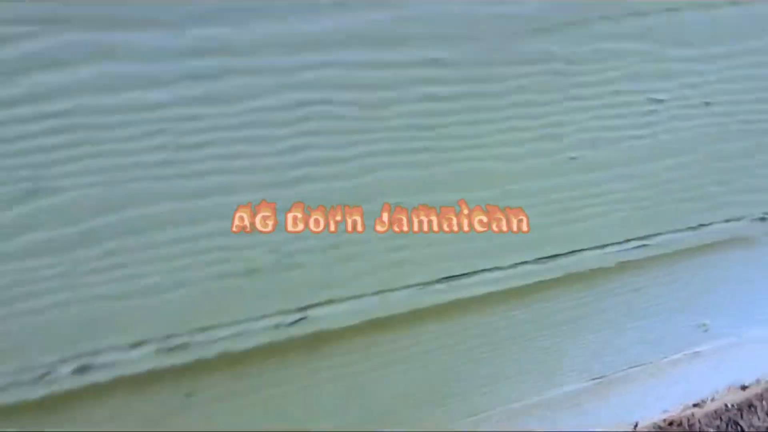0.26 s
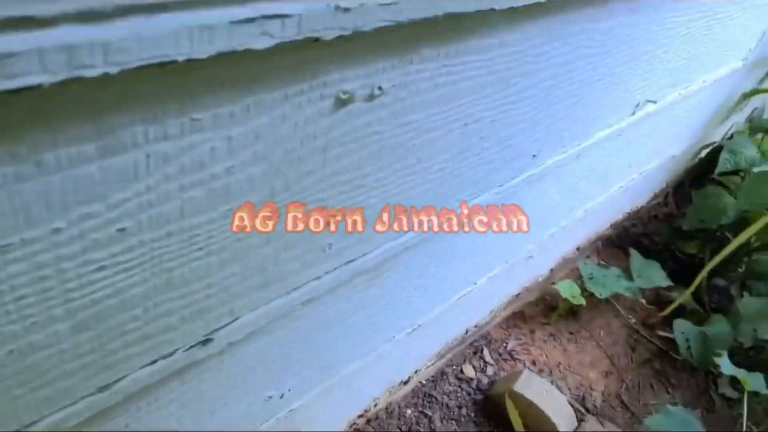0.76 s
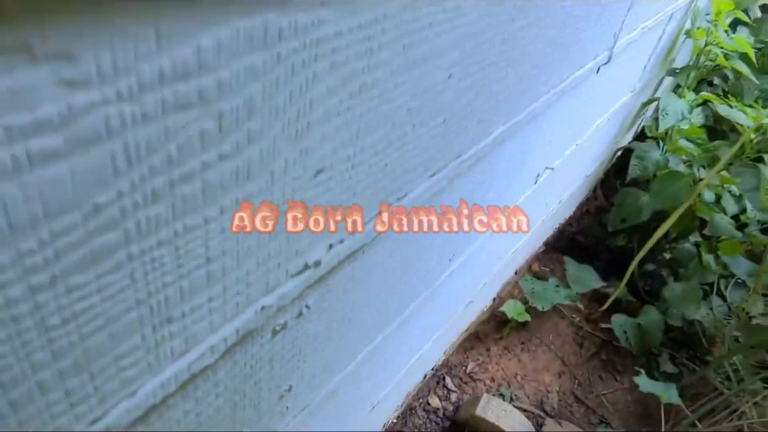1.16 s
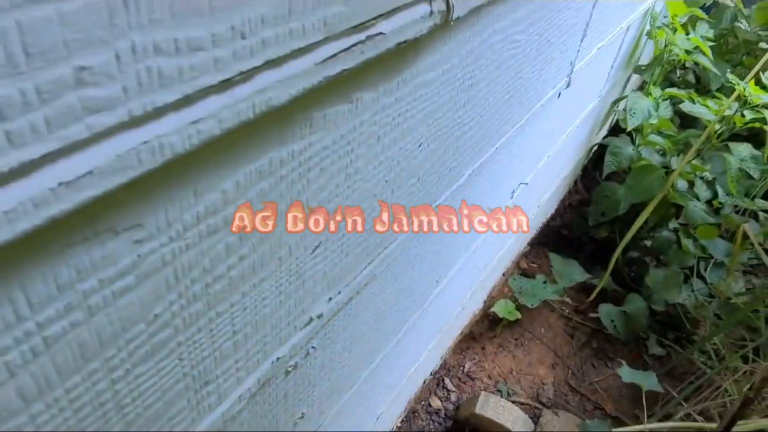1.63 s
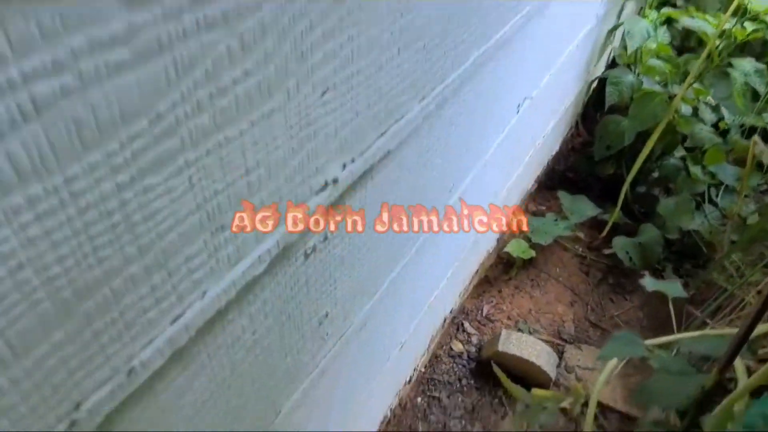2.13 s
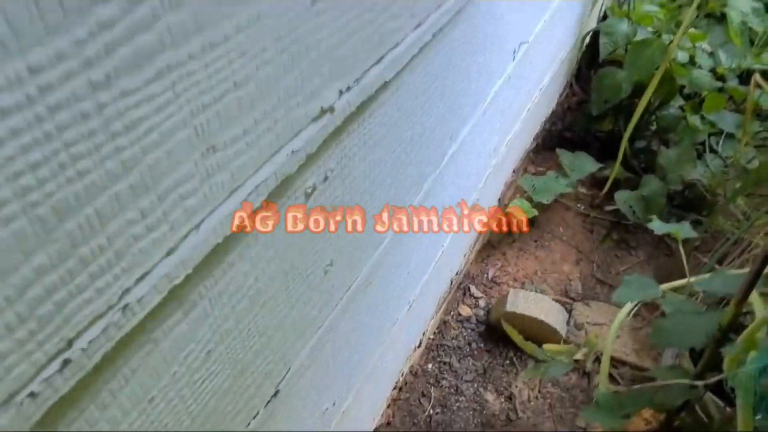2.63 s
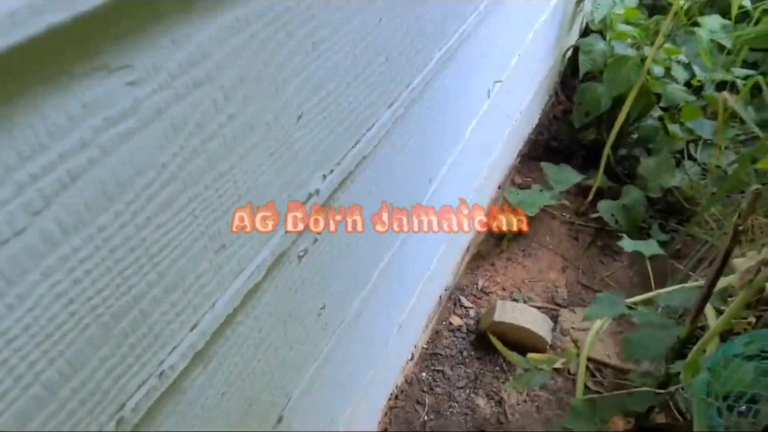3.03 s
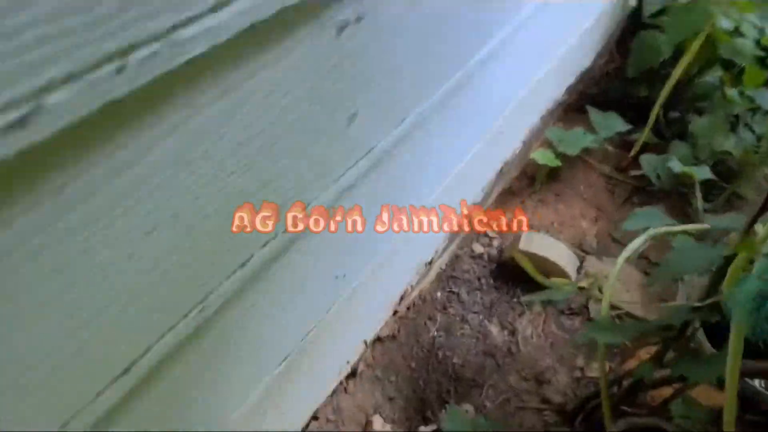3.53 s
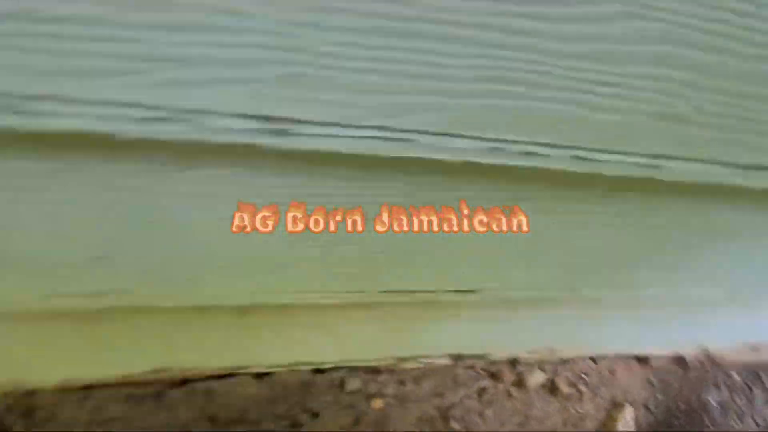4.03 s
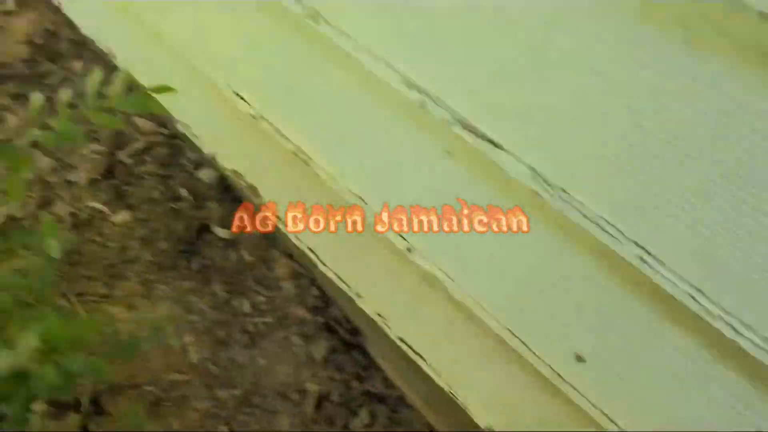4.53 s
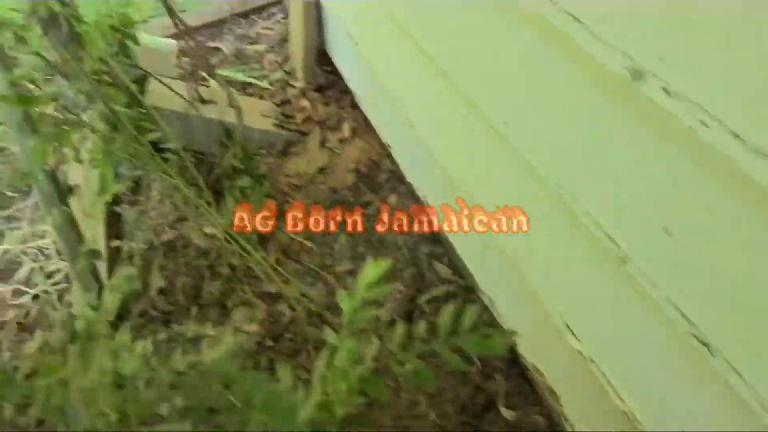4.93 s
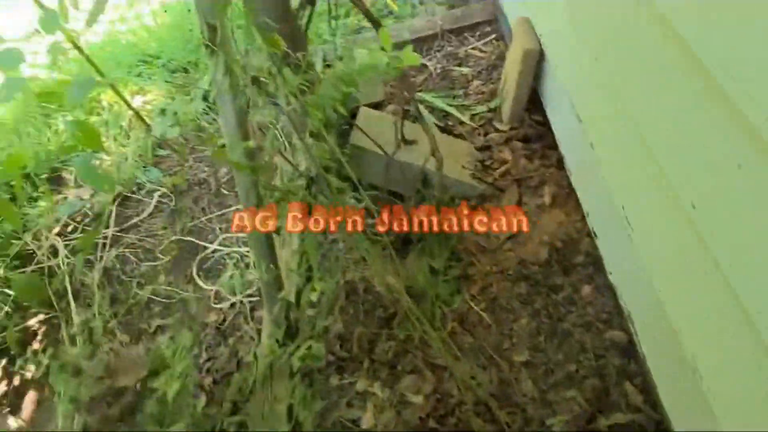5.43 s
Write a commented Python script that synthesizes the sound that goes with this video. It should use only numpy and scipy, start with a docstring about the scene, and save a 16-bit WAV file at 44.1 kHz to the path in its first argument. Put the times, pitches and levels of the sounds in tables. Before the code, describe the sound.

Outdoors beside a house wall, plants rustle and the handheld microphone catches close scuffs and dry ticks. Beyond, a low engine drone with soft tyre wash grows, throbs openly as the vehicle passes around four seconds, drops in pitch and fades. A steady leaf hiss runs throughout, a little stronger in the second half.

```python
"""An exhaust drone swells, sinks in pitch, throbs openly and fades, over a wash of tyre noise; leaves hiss,
and close by there are scuffs and small ticks, as someone shifts among the plants beside a house wall.
The passing vehicle's engine is a sum of harmonics of two uneven firings a cycle, lowered in pitch by Doppler.
Tyres and leaves are coloured noise and moving resonances; scuffs and ticks are brief shaped bursts of noise."""
import sys
import numpy as np
from scipy import signal
from scipy.fft import rfft, irfft, next_fast_len
from scipy.io import wavfile

SR = 44100
rng = np.random.default_rng(int(sys.argv[2]) if len(sys.argv) > 2 else 0)


def dump(signal):
    """Clip the signal to [-1, 1] and save it as 16-bit WAV at the path in sys.argv[1]."""
    limited = np.clip(np.atleast_2d(signal).T, -1, 1)
    pcm = np.round(limited * 32767).astype(np.int16)
    wavfile.write(sys.argv[1], SR, pcm)


N = 250478
TIME = np.arange(N) / SR  # seconds

# The exhaust is heard openly between two moments and is screened before and after; edge softness in s.
OPENS_S, CLOSES_S, EDGE_S = 3.58, 4.55, 0.16
# Engine cycles per second at the nearest point, before the Doppler shift.
CYCLE_HZ = 19.97
# How far the boom and the drone lead on the left: (time [s], lead [radians])
BOOM_LEAD = [(0, -0.1), (2.8, 0.12), (3.4, -0.19), (4.1, -0.41), (4.7, -0.32), (5.68, -0.12)]
# How far the orders outside the boom lead on the left while coming: (frequency [Hz], lead [radians])
COMING_PHASE = [(40, 0.68), (170, 0.17), (230, 0.9), (280, 0.98), (360, 2.1)]
# The same once the vehicle is near: (frequency [Hz], lead [radians])
NEAR_PHASE = [(70, -0.13), (200, -0.49), (360, -0.66)]


def scene():
    """The vehicle out on the road, the garden close by."""
    return engine() + drone() + road() + whoosh() + scuffs() + ticks() + leaves()


def engine():
    """Firing pulses boom through the pipe; an order is a harmonic of the engine cycle."""
    uneven_open_db, uneven_screened_db = 0.3, 0.6  # spread of firing strength, and what screening adds
    shade_db_per_radian = 2.5  # the side that leads is also louder
    rate, _ = pass_by()
    angle = turning(rate)
    lead, = in_time(BOOM_LEAD)
    opened, closed = after(OPENS_S, EDGE_S), after(CLOSES_S, EDGE_S)
    exhaust = boom(angle, lead) + coming(angle, opened) + flares(angle) + abreast(angle) + going(angle, closed)
    # The strength flickers from firing to firing, most of all behind the screen.
    uneven_db = uneven_open_db + uneven_screened_db * (1 - opened + closed)
    uneven = from_db(uneven_db * drift(30))
    shade = from_db(shade_db_per_radian * lead * np.array([[.5], [-.5]]))
    return shade * uneven * exhaust


def boom(angle, lead):
    """The four orders that the pipe favours share one boom, each swelling and fading in its own time."""
    # (order, relative level at its peak [dB], peak time [s], rise [dB per s], fall [dB per s])
    boom_orders = [(4, -5.5, 3.54, 4, 12.5), (5, 0, 4.05, 5.5, 8), (6, -2.5, 3.93, 3.5, 13),
                   (7, -6.5, 4.37, 6, 9.5)]
    # Loudness of the whole boom: (time [s], level [dB])
    boom_level = [(0, -26), (0.8, -23.5), (1.6, -23), (1.85, -19), (2.2, -19), (2.52, -14.5), (2.95, -19),
                  (3.06, -21.5), (3.14, -15.5), (3.35, -14), (3.65, -15), (3.88, -11.5), (4.2, -14),
                  (4.49, -14), (4.62, -18.3), (4.87, -22), (5.1, -21.5), (5.68, -22.5)]
    boom_db, = in_time(boom_level)
    shares = np.array([from_db(db + swell(s, rise, fall)) for _, db, s, rise, fall in boom_orders])
    shares = shares / np.linalg.norm(shares, axis=0)  # their powers add up to 1
    tones = sum(share * exhaust_order(angle, round(row[0]), lead, waver_db=2.0)
                for row, share in zip(boom_orders, shares))
    return from_db(boom_db) * tones


def coming(angle, opened):
    """Thin orders below and above the boom, until the exhaust is heard openly."""
    # (order, relative level [dB])
    coming_orders = [(2, 0.5), (3, -9), (8, 0.5), (9, -3), (10, -13), (11, -6), (12, -12), (13, 1),
                     (14, -23), (15, -2), (17, -4)]
    # Their common level: (time [s], level [dB])
    coming_level = [(0, -45), (1.0, -43), (1.5, -45.5), (1.85, -52.5), (2.2, -49), (2.8, -56.5), (3.2, -51)]
    level_db, = in_time(coming_level)
    tones = order_set(angle, coming_orders, COMING_PHASE, waver_db=1.0)
    return from_db(level_db) * (1 - opened) * tones


def flares(angle):
    """Reflections lift single orders for a while."""
    # (order, peak level [dB], peak time [s], spread of its bell shape [s])
    lifted_orders = [(2, -37, 3.55, 0.71), (8, -39.5, 2.3, 0.25), (9, -40.5, 2.5, 0.34),
                     (11, -46, 2.84, 0.43), (13, -44.5, 2.45, 0.25), (15, -41.5, 2.22, 0.19),
                     (9, -40, 5.3, 0.19), (10, -36.5, 5.48, 0.31), (12, -46, 5.76, 0.26)]
    return sum(bell(s, spread) * order_set(angle, [(k, db)], COMING_PHASE, waver_db=3.0)
               for k, db, s, spread in lifted_orders)


def abreast(angle):
    """As the vehicle comes abreast, its upper orders open up and close one by one."""
    # (order, level [dB], opens [s], closes [s])
    abreast_orders = [(8, -36, 3.66, 4.8), (9, -29.5, 3.52, 4.55), (10, -27.3, 3.74, 4.56),
                      (11, -29, 3.445, 4.47), (12, -30, 3.64, 4.44), (13, -37.5, 3.59, 4),
                      (14, -36, 3.68, 4.34), (15, -41.5, 3.92, 4.4), (17, -43, 3.9, 4.23),
                      (18, -47.5, 3.03, 4.25)]
    opening_edge_s, flutter_db = 0.11, 1.2
    total = 0
    for k, db, opens, closes in abreast_orders:
        gate = after(opens, opening_edge_s) - after(closes, EDGE_S)
        flutter = from_db(flutter_db * drift(22))
        total = total + gate * flutter * order_set(angle, [(k, db)], NEAR_PHASE, waver_db=1.5)
    return total


def going(angle, closed):
    """Upper orders that fade steadily as the vehicle leaves."""
    # (order, relative level [dB])
    going_orders = [(8, -9), (9, -3), (10, 1.5), (11, -14), (12, 0.5), (13, -10), (14, -7), (15, -7.5),
                    (16, -15), (17, -11)]
    start_db, fade_db_per_s = -33.5, 12
    fade = from_db(start_db - fade_db_per_s * np.abs(TIME - CLOSES_S))
    return fade * closed * order_set(angle, going_orders, NEAR_PHASE, waver_db=0.5)


def order_set(angle, orders, phase, waver_db):
    """A set of orders, each with its own lead between the two sides."""
    return sum(from_db(db) * exhaust_order(angle, round(k), at_hz(phase, k * CYCLE_HZ), waver_db)
               for k, db in orders)


def exhaust_order(angle, order, lead, waver_db):
    """One harmonic of two uneven firings, delayed by the pipe and wavering on its way; rms about 1."""
    # Pipe resonances: (centre [Hz], width [Hz])
    pipe_modes = [(119, 23), (280, 150)]
    # The second firing comes slightly early: its place (share of the cycle) and relative strength.
    second_firing, second_strength = 0.4375, 0.97
    path_wander_rad = 0.15  # changing paths shift each order's phase
    mean_hz = order * (angle[-1] - angle[0]) / (2 * np.pi * TIME[-1])
    firings = 1 + second_strength * np.exp(-2j * np.pi * order * second_firing)
    pipe = sum(1 / (1 + 1j * (mean_hz ** 2 - centre ** 2) / (mean_hz * width)) for centre, width in pipe_modes)
    delay = np.angle(-firings * pipe)  # only the phase is used; the tables set the levels
    sides = lead * np.array([[.5], [-.5]])
    wander = path_wander_rad * drift(1.9)
    tone = np.sqrt(2) * np.cos(order * angle + delay + smear(order) + wander + sides)
    return tone * from_db(waver_db * drift(2.9))


def smear(order):
    """Phase shift (radians) from reflections, which blur each firing until the direct path takes over."""
    # The shift grows with the square of the distance from this order, and wraps round the circle.
    base_order, base_rad, bend_rad = 5, 0.45, 0.25
    ends_s, edge_s = 3.0, 0.3
    shift = np.angle(np.exp(1j * (base_rad + bend_rad * (order - base_order) ** 2)))
    return shift * (1 - after(ends_s, edge_s))


def pass_by():
    """Doppler-shifted cycle rate (Hz) and distance loss (dB) of a vehicle on a straight road."""
    speed_m_per_s, least_distance_m, nearest_s = 19.96, 22.7, 3.886
    sound_m_per_s, slowing_hz_per_s = 343, 0.0363  # the engine itself slows too
    along = speed_m_per_s * (TIME - nearest_s)
    distance = np.hypot(along, least_distance_m)
    doppler = 1 / (1 + speed_m_per_s / sound_m_per_s * along / distance)
    cycle_hz = CYCLE_HZ - slowing_hz_per_s * (TIME - nearest_s)
    return cycle_hz * doppler, 20 * np.log10(least_distance_m / distance)


def drone():
    """Two tones of another rotation sound between the engine's orders and beat against them."""
    # (order, level at its peak [dB], peak time [s], rise [dB per s], fall [dB per s])
    drone_orders = [(2, -29, 5.1, 1, 16), (3, -29.5, 5.1, 4, 26)]
    # (time [s], rotation [turns per s])
    drone_rate = [(0, 36.15), (2.5, 36.7), (3.25, 36.3), (4.06, 35.6), (5.27, 33.7), (5.68, 33.4)]
    angle = turning(in_time(drone_rate)[0])
    lead, = in_time(BOOM_LEAD)
    return sum(from_db(db + swell(s, rise, fall)) * exhaust_order(angle, round(k), lead, waver_db=1.5)
               for k, db, s, rise, fall in drone_orders)


def road():
    """Rumble is nearly alike on both sides; the tyre wash is wide, mostly opposite on the two sides."""
    # Reference level of the tyre wash: (time [s], level [dB])
    tyre_level = [(0, -45.5), (0.6, -46.5), (2.0, -44), (2.7, -42), (3.3, -40.5), (4.0, -42), (4.2, -42.5),
                  (5.3, -41), (5.68, -42.5)]
    # Hollow roar, opposite on the two sides:
    # (time [s], centre [Hz], level relative to the tyre reference [dB])
    roar_centre = [(0, 810, 4), (1.0, 730, 10.5), (1.6, 740, 10.5), (2.1, 700, 9), (2.7, 700, 9.5),
                   (3.25, 600, 0), (3.6, 700, 6), (3.86, 730, -1), (4.15, 690, 7.5), (4.7, 630, 8.5),
                   (5.68, 580, 4.5)]
    # Whir in the middle, a little above the roar and about as broad: (time [s], level [dB])
    whir_level = [(0, -45), (0.95, -46), (1.25, -51), (2.0, -48), (2.6, -45), (3.75, -49.5), (4.0, -51),
                  (4.6, -46), (5.68, -46.5)]
    # Spectra of the rumble and of the wash, middle and sides: (frequency [Hz], relative level [dB per Hz])
    rumble_colour = [(20, -21), (30, -10), (38, -1), (48, 0.5), (65, 0.5), (90, 6.5), (125, -5.5),
                     (160, -8), (220, -10), (320, -20), (500, -33)]
    middle_colour = [(250, -24), (350, 4.5), (430, -0.5), (520, 0), (650, 2), (800, 2), (1020, -2.5),
                     (1400, -0.5), (1750, -3.5), (2200, -9.5), (3000, -21), (4500, -41)]
    side_colour = [(200, -1), (330, 6), (430, -8), (540, 8), (760, 6.5), (1000, 6.5), (1350, 9.5),
                   (1700, 2), (2200, -8.5), (3000, -13), (4500, -29)]
    rumble_db, rumble_follows = -29, 0.46  # level at the nearest point, share of the distance loss
    hollow_full_s, hollow_rise_db_per_s = 1.24, 16
    _, distance_db = pass_by()
    tyre_db, = in_time(tyre_level)
    roar_hz, roar_db = in_time(roar_centre)
    whir_db, = in_time(whir_level)
    apart = np.array([[1], [-1]])  # opposite on the two sides
    low_mid, low_side = noise(rumble_colour)
    rumble = from_db(rumble_db + rumble_follows * distance_db) * (low_mid + from_db(-15) * low_side * apart)
    # A low hollow resonance fades in, and is weaker while the vehicle is in the open.
    hollow_hz = np.full(N, 425.8)
    in_open = after(OPENS_S, EDGE_S) - after(CLOSES_S, EDGE_S)
    hollow_db = tyre_db - 4.5 - 10.5 * in_open
    hollow_db = hollow_db + hollow_rise_db_per_s * np.minimum(0, TIME - hollow_full_s)
    mid = from_db(tyre_db + 3.5) * wandering(noise(middle_colour, channels=1), patchy_db=1.5)
    mid = mid + moving_resonance(1.11 * roar_hz, whir_db, width_hz=247)  # the whir
    mid = mid + moving_resonance(hollow_hz, hollow_db, width_hz=49)
    side = from_db(tyre_db + 8.0) * wandering(noise(side_colour, channels=1), patchy_db=3.0)
    side = side + moving_resonance(roar_hz, tyre_db + roar_db, width_hz=245)  # the roar
    side = side + moving_resonance(hollow_hz, hollow_db + 9.0, width_hz=59)
    return rumble + mid + side * apart


def whoosh():
    """A rough, rising band of tyre noise from straight ahead, just before the vehicle is nearest."""
    # (time [s], centre [Hz], level [dB])
    whoosh_path = [(3.12, 579, -53), (3.32, 634, -40), (3.5, 705, -47), (3.65, 788, -44), (3.8, 812, -36)]
    hz, db = in_time(whoosh_path)
    sounding = after(whoosh_path[0][0], .04) - after(whoosh_path[-1][0], .04)
    rough_db = 3 * drift(30)
    return sounding * moving_resonance(hz, db + rough_db, width_hz=270)


def scuffs():
    """Brief gritty rubs that swell and fade, each with a hollow body of its own strength."""
    # (time [s], level before the grit [dB], spread of its bell shape [s], body relative to scratch [dB])
    rubs = [(0.068, -34.5, 0.02, -9), (0.3, -39.5, 0.009, -10), (0.675, -43, 0.012, -12),
            (0.75, -40.5, 0.018, 0), (0.783, -34, 0.016, 3), (0.945, -44, 0.02, -6),
            (3.125, -48, 0.012, -10), (4.455, -41, 0.028, -20)]
    # Spectra of scratch and hollow body: (frequency [Hz], relative level [dB per Hz])
    scratch_colour = [(1500, -5), (2800, 3.5), (6000, 1.5), (9000, -2), (16000, -6.5)]
    body_colour = [(300, -14), (600, 9), (800, 13.5), (1200, 4), (2500, -13)]
    scratch = sum(from_db(db) * bell(s, spread) for s, db, spread, _ in rubs)
    body = sum(from_db(db + body_db) * bell(s, spread) for s, db, spread, body_db in rubs)
    grit = from_db(2.4 * drift(250) - 3)  # a fast flicker, 3 dB down
    return grit * (scratch * noise(scratch_colour) + body * noise(body_colour))


def ticks():
    """Each small dry tick is a sudden, fast-dying burst in a broad resonance."""
    # (time [s], level before the decay [dB], centre [Hz], decay time [s])
    tick_list = [(0.297, -41, 10000, 0.006), (0.296, -38, 3000, 0.005), (0.327, -44, 11000, 0.005),
                 (0.56, -32.5, 5600, 0.007), (0.617, -46, 12000, 0.02), (0.725, -40, 3200, 0.006),
                 (1.63, -53, 11000, 0.015), (1.933, -46, 11000, 0.004), (2.13, -54, 13000, 0.004),
                 (2.31, -49, 14500, 0.004), (2.52, -54, 9000, 0.015), (3.253, -44, 14500, 0.006),
                 (3.305, -27.5, 14800, 0.007), (3.442, -38, 7000, 0.003), (3.443, -42, 14000, 0.008),
                 (4.423, -37, 7000, 0.003), (4.472, -23.5, 14200, 0.0018), (4.472, -25, 4800, 0.0024)]
    width_hz = 3800
    out = np.zeros((2, N))
    age = np.arange(SR // 8) / SR
    for s, db, hz, decay in tick_list:
        b, a = signal.iirpeak(hz, hz / width_hz, fs=SR)
        ringing = rms_one(signal.lfilter(b, a, rng.standard_normal((2, len(age)))))
        start = round(s * SR)
        out[:, start:start + len(age)] += from_db(db) * ringing * np.exp(-age / decay)
    return out


def leaves():
    """Foliage hisses all round; finer rustle and sizzle are grainy, crackle, and rise where plants brush by."""
    # Level of the hiss: (time [s], level [dB])
    hiss_level = [(0, -41), (0.5, -46.5), (0.9, -46), (1.2, -49.5), (2.3, -48), (3.0, -45), (3.7, -40),
                  (4.7, -40.5), (5.68, -43.5)]
    # Plants brushing by close at hand: (start [s], end [s], level in the sizzle [dB])
    brushes = [(-0.1, 0.346, -48), (0.36, 0.545, -49.5), (0.724, 1.138, -51), (3.234, 3.764, -53)]
    # Spectra, from the broad hiss to the finest sizzle: (frequency [Hz], relative level [dB per Hz])
    hiss_colour = [(1500, -5.5), (2800, 4.5), (3800, 0.5), (4800, 0), (5700, 4), (7000, 1.5), (8000, -5.5),
                   (9000, -21), (16000, -36)]
    rustle_colour = [(5000, -21), (8000, 2), (10000, 4), (12000, -3), (16000, -23)]
    sizzle_colour = [(9000, -7), (12000, 7), (14000, 6), (15000, 8), (16000, 0)]
    # Levels at the strongest hiss, without brushing, and how steeply each follows the hiss (dB per dB).
    rustle_db, sizzle_db, rustle_swing, sizzle_swing = -50, -57.5, 2.25, 0.83
    brush_edge_s, brush_rustle_db = 0.085, -4  # brushing is weaker in the rustle than in the sizzle
    hiss_db, = in_time(hiss_level)
    lull_db = hiss_db - hiss_db.max()
    brush = sum(from_db(db) * (after(start, brush_edge_s) - after(end, brush_edge_s))
                for start, end, db in brushes)
    rustle_gain = np.hypot(from_db(rustle_db + rustle_swing * lull_db), from_db(brush_rustle_db) * brush)
    sizzle_gain = np.hypot(from_db(sizzle_db + sizzle_swing * lull_db), brush)
    stir_db = .5 * drift(9.8)
    hiss = from_db(hiss_db + stir_db) * noise(hiss_colour)
    rustle = rustle_gain * from_db(stir_db + 1.1 * drift(150)) * noise(rustle_colour)
    sizzle = sizzle_gain * from_db(2 * stir_db + 0.67 * drift(150)) * noise(sizzle_colour)
    # About nine snaps a second, each dying away in 4.1 ms.
    snaps = (rng.random(N) < 9 / SR) * rng.uniform(.5, 1.5, N)
    crackle = signal.lfilter([1], [1, -np.exp(-1 / (0.0041 * SR))], snaps + 1e-18)
    return hiss + (rustle + sizzle) * (1 + crackle)


def moving_resonance(hz, db, width_hz):
    """Noise ringing in a resonance whose centre and level follow curves."""
    slow_noise = drift(width_hz / 2) + 1j * drift(width_hz / 2)
    return from_db(db) * rms_one(np.real(slow_noise * np.exp(1j * turning(hz))))


def wandering(x, patchy_db, count=14):
    """Moving air lets each narrow band of a far sound swell and sink on its own; rms 1."""
    size = next_fast_len(N)
    spectrum = rfft(x, size)
    # Overlapping bands, evenly spaced in pitch from 350 to 3000 Hz.
    place = at_hz([(350, 0), (3000, count - 1)], np.fft.rfftfreq(size, 1 / SR))
    total = 0
    for k in range(count):
        band = irfft(spectrum * np.maximum(0, 1 - np.abs(place - k)), size)[:, :N]
        total = total + band * from_db(patchy_db * drift(7.3))
    return rms_one(total)


def noise(colour, channels=2):
    """Unrelated noises of one colour, falling steeply beyond its ends; rms 1."""
    size = next_fast_len(N)
    hz = np.fft.rfftfreq(size, 1 / SR) + 1e-3
    skirts = np.minimum(1, np.minimum(hz / colour[0][0], colour[-1][0] / hz)) ** 2
    spectrum = rfft(rng.standard_normal((channels, size))) * from_db(at_hz(colour, hz)) * skirts
    return rms_one(irfft(spectrum, size)[:, :N])


def drift(rate):
    """A random curve of rms 1, with changes up to about `rate` a second."""
    step, size = 16, 16384  # computed at every 16th sample, then joined by straight lines
    slowness = 1 + (np.fft.rfftfreq(size, step / SR) / rate) ** 4
    slow = irfft(rfft(rng.standard_normal(size)) / slowness)
    return rms_one(np.interp(np.arange(N) / step, np.arange(size), slow))


def turning(rate):
    """Angle (radians) of a rotation at `rate` turns per second, zero at the moment of one firing."""
    firing_s = 4.0107
    angle = 2 * np.pi * np.cumsum(rate) / SR
    return angle - np.interp(firing_s, TIME, angle)


def after(s, edge_s):
    """A soft step from 0 to 1 at a moment."""
    return .5 + .5 * np.tanh((TIME - s) / edge_s)


def swell(peak_s, rise_db_per_s, fall_db_per_s):
    """A steady rise to 0 dB, then a steady fall."""
    return np.minimum(rise_db_per_s * (TIME - peak_s), fall_db_per_s * (peak_s - TIME))


def bell(s, spread_s):
    """A smooth swell and fade about a moment."""
    return np.exp(-.5 * ((TIME - s) / spread_s) ** 2)


def in_time(rows):
    """One curve over time for each column of a table after the first."""
    s, *columns = np.transpose(rows)
    return [np.interp(TIME, s, column) for column in columns]


def at_hz(points, hz):
    """Read a table on a log-frequency axis."""
    freqs, values = np.transpose(points)
    return np.interp(np.log(hz + 1e-9), np.log(freqs), values)


def from_db(db):
    """Decibels to gain."""
    return 10 ** (np.asarray(db) / 20)


def rms_one(x):
    """Scale to rms 1."""
    return x / np.sqrt(np.mean(np.abs(x) ** 2) + 1e-20)


def record(dry):
    """A steep low-pass filter removes the treble above 15.9 kHz."""
    low_pass = signal.ellip(12, .1, 80, 15900, fs=SR, output="sos")
    return signal.sosfilt(low_pass, dry)


dry = scene()
out = record(dry)
dump(out)
```